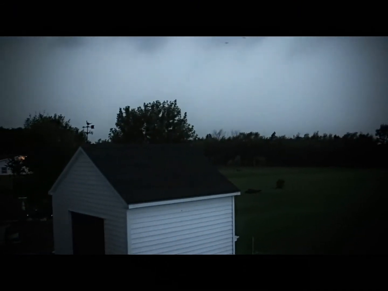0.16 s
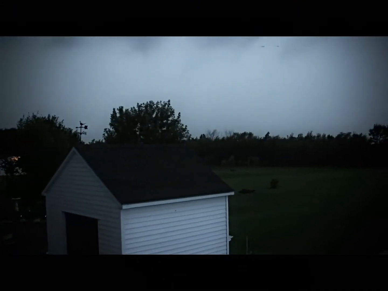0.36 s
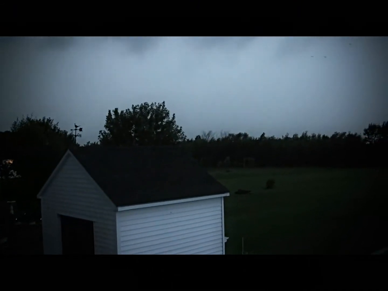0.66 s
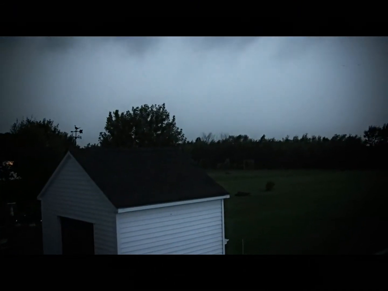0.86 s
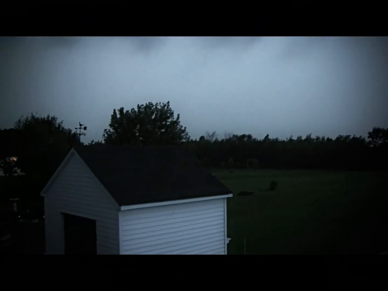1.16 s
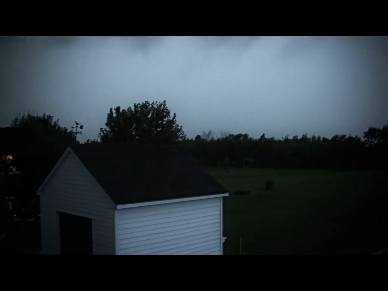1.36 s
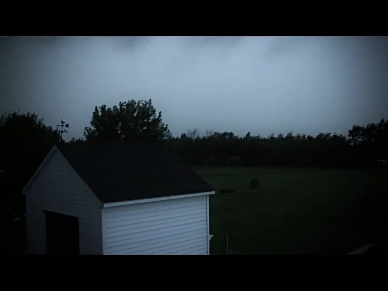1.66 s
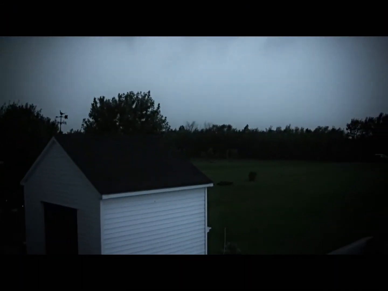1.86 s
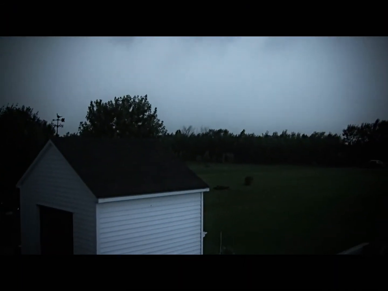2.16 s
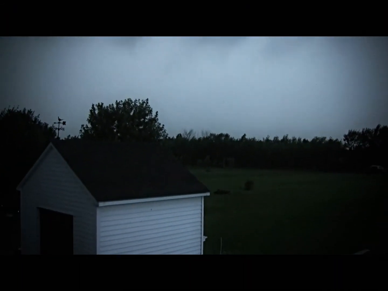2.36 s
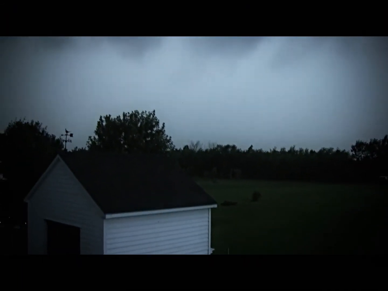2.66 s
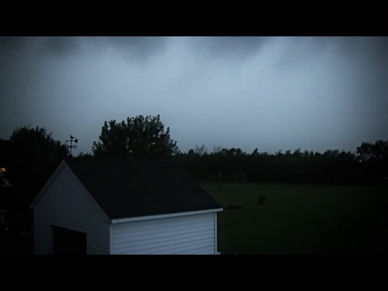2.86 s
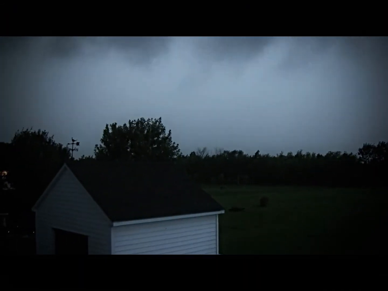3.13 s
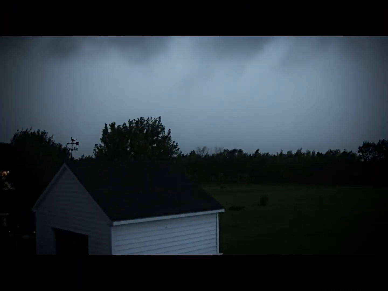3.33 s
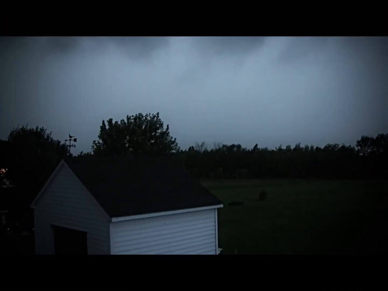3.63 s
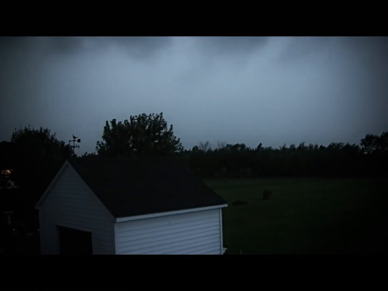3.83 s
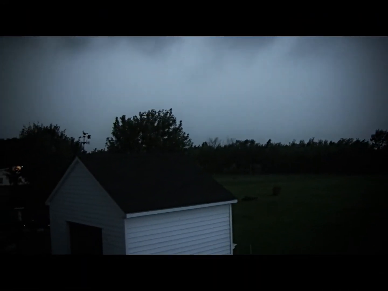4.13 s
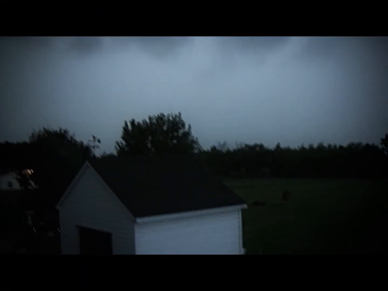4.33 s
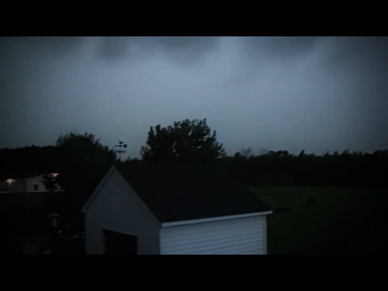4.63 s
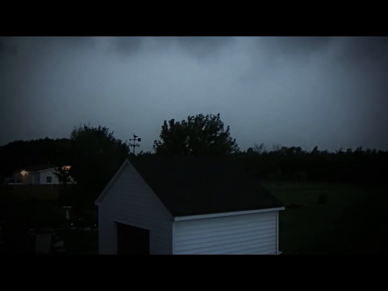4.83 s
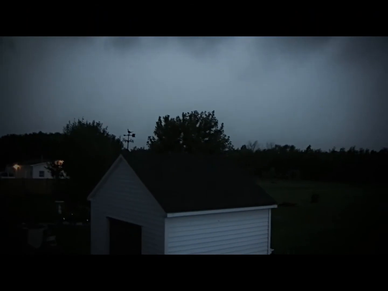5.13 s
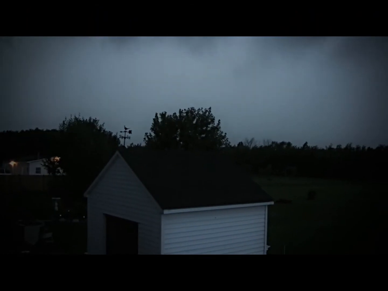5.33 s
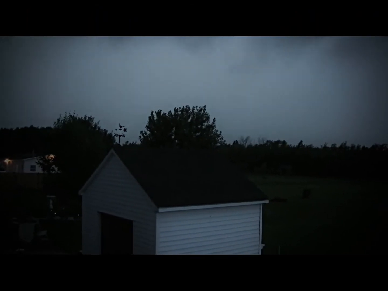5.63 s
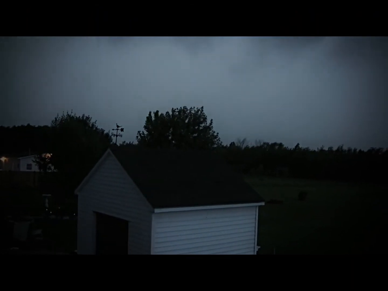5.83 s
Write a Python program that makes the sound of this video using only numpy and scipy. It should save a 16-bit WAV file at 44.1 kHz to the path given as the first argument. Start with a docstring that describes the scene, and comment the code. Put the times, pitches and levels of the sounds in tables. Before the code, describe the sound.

Outdoors in light rain, a brief low murmur and faint hiss are broken almost at once by a close thunderclap. Huge bassy thuds pile up for about two seconds while a hard object, like a window frame, clacks close to the microphone. The thunder then rolls away, duller and softer, in uneven bumps to the end.

```python
"""A close thunderclap over a field, in light rain, taken from an upper window on two close microphone ports.
Shock fronts from the crooked lightning channel, random kicks coloured in four registers, arrive in great
claps and thuds, then roll on, duller with distance. Something hard clacks beside the microphone, like a
window frame being nudged: scattered noise and ringing modes. Far off lie a hiss of rain (merged drops), a
low murmur and whooshes (filtered noise), and faint peeps (tone bursts). A limiter holds the highest peaks."""
import sys
import numpy as np
from scipy import signal
from scipy.fft import rfft, irfft
from scipy.io import wavfile
from scipy.ndimage import uniform_filter1d, minimum_filter1d

SR = 44100
rng = np.random.default_rng(int(sys.argv[2]) if len(sys.argv) > 2 else 0)


def unload_audio(sound):
    """Save the sound as a 16-bit wav file, at the path given as the first command line argument."""
    columns = np.transpose(np.atleast_2d(sound))
    # keep every value between -1 and 1, then stretch to whole-number steps
    steps = np.round(np.clip(columns, -1, 1) * 32767)
    wavfile.write(sys.argv[1], SR, steps.astype(np.int16))


N = 264319
TIME, FREQ = np.arange(N) / SR, np.fft.rfftfreq(N, 1 / SR)

# the two microphone ports, left over right: [f/Hz, level difference/dB]
PORT_LEAN = [(60, 1.5), (110, 0), (200, -1), (380, -3.5), (700, -1.5), (1290, -1.0), (2380, -1.5),
             (4400, -0.5), (8120, -2), (15000, -9.5)]
# the two microphone ports, sound they do not share: [f/Hz, level/dB]
PORT_UNSHARED = [(30, -6.5), (70, -35), (150, -21), (300, -20.5), (600, -15.5), (1500, -10.5), (3000, -5),
                 (6000, -5), (10000, -4.5), (15000, -4)]
# distant rain, relative colour: [f/Hz, level/dB per Hz]
RAIN_COLOUR = [(100, 4.5), (800, 12.5), (1500, 7.5), (2200, 4), (3200, -0.5), (5000, -3.5), (7000, -7.5),
               (10000, -13), (14000, -16.5), (16000, -17.5)]
# steady low murmur of the outdoors, relative colour: [f/Hz, level/dB per Hz]
MURMUR_COLOUR = [(20, -39.5), (45, -16.5), (70, -8), (100, -2.5), (130, -2.5), (175, -4.5), (250, 2.5),
                 (285, -1), (335, 3), (400, -8.5), (650, -13), (1000, -20), (2000, -36), (6000, -75)]
# shock fronts from the near part of the channel, relative colour: [f/Hz, level/dB per Hz]
NEAR_COLOUR = [(20, -38), (42, -19), (70, -6), (110, -4.5), (160, -3.5), (245, -1.5), (320, -8.5),
               (480, -11), (700, -15.5), (1000, -24), (1400, -31.5), (2000, -43), (3000, -57), (5000, -97)]
# shock fronts from the far part of the channel, relative colour: [f/Hz, level/dB per Hz]
FAR_COLOUR = [(20, -46), (42, -27), (72, -5.5), (125, -5), (157, 2), (190, -2.5), (250, -1.5), (350, -11.5),
              (500, -15.5), (750, -20.5), (1000, -37), (1300, -37.5), (1900, -60), (4000, -59)]
# claps, one from each branch or bend of the channel; each register takes its own share of the brightness:
# [start t/s, relative level/dB, rise t/s, hold t/s, brightness/dB]
CHANNEL_CLAPS = [(0.307, -12, 0.083, 0.028, 3.5), (0.442, -18, 0.023, 0.31, 7),
                 (0.571, -12.5, 0.013, 0.11, -4.3), (0.759, -10.5, 0.025, 0.039, -5.5),
                 (0.907, -16.5, 0.011, 0.072, -6), (1.211, -18.5, 0.012, 0.021, -2),
                 (1.574, -18.3, 0.041, 0.098, 8.5), (1.795, -28.5, 0.07, 0.026, 11.5),
                 (2.07, -19, 0.056, 0.051, 5), (2.22, -24, 0.046, 0.32, 6.5),
                 (2.615, -31.5, 0.052, 0.021, 12.5), (2.846, -18, 0.076, 0.15, -1),
                 (3.112, -19.5, 0.053, 0.16, -3), (3.473, -25.5, 0.029, 0.031, 5.5),
                 (3.616, -18.5, 0.019, 0.015, -7.5), (3.853, -21, 0.014, 0.16, -28),
                 (4.112, -32.5, 0.024, 0.004, -24), (4.235, -23.5, 0.08, 0.23, -4),
                 (4.626, -26.5, 0.083, 0.028, 7.5), (4.725, -23, 0.041, 0.259, -4.5),
                 (5.213, -19, 0.025, 0.019, -5), (5.337, -27, 0.047, 0.14, -2.5),
                 (5.534, -26.5, 0.037, 0.007, 6.5)]
# the unbroken roll that carries the claps, followed by each register to its own degree: [t/s, level/dB]
ROLL_LEVEL = [(0.33, -35.5), (0.39, -22), (0.6, -18), (1.07, -24.5), (1.23, -22.5), (1.51, -26.5),
              (1.7, -15.5), (1.76, -22.5), (1.78, -16), (1.92, -25), (2.16, -22), (3.92, -33.5),
              (5.99, -37)]
# pressure swell, boom, body and tearing edge of the thunder, levels before the overall trim:
# [low f/Hz, high f/Hz, level at the roll reference/dB, follow/dB per dB of roll,
#  share of a clap/dB, share of its brightness/1, lurch rms/dB]
THUNDER_REGISTERS = [(15, 76, -40, 0.86, -25, 0.23, 1), (90, 172, -27.5, -0.04, 0, 0.12, 1.46),
                     (207.6, 413, -23.5, 0.78, -1.5, 1, 0.5), (418, 6000, -25.5, 0.95, -19.5, 0.8, 1)]
# blows on the frame; the ring is set against the noise burst and trimmed with all its modes:
# [t/s, level/dB, tilt/dB per octave, top of the colour f/Hz, ring level before trim/dB, scatter t60/s]
FRAME_BLOWS = [(.354, -23, 2, 2410, -16, 0.076), (0.634, -32, 0.5, 12000, -14.5, 0.15),
               (1.2256, -34, 13, 16000, -23, .015), (1.2305, -18, 4, 9000, -0.5, 0.063),
               (1.231, -22, 4.5, 14000, 2, 0.12), (1.352, -34, 1.5, 7000, -19, 0.12),
               (1.3648, -16.5, 0.5, 6550, -32, 0.063), (1.379, -25.5, 6, 8650, -14, 0.068),
               (1.384, -23.5, -2.5, 8000, -16, 0.12), (1.757, -37, 3.5, 10000, -26, 0.09)]
# modes of the frame, each detuned a little at every blow: [nominal f/Hz, relative level/dB, t60/s]
FRAME_MODES = [(730, 9, 0.087), (1100, 1, 0.076), (1570, 5.5, 0.01), (2190, 9, 0.028), (2300, 7, 0.025),
               (2950, -24, 0.034), (3460, -10.5, .07), (4230, -17, 0.059), (5540, -21, .06),
               (6700, -14.5, 0.078)]
# clack as the nearby walls scatter it, relative colour: [f/Hz, level/dB per Hz]
SCATTER_COLOUR = [(150, -30), (600, 9), (1100, 10), (2200, 2.5), (2900, -7.5), (4500, -11), (6800, -18),
                  (9000, -26), (11500, -36.5), (15500, -34)]
# faint peeps in the distance: [centre t/s, level/dB, f/Hz, half-length to 1/e t/s]
DISTANT_PEEPS = [(.365, -59.5, 4470, .04), (.97, -61.5, 4450, .03), (2.105, -54, 5080, 0.024),
                 (2.105, -69, 8080, .025)]
# the heaviest single thuds, before the ports' lean: [centre t/s, level/dB, f/Hz, half-length to 1/e t/s]
HEAVY_THUDS = [(.402, -3, 124, 0.019), (.748, -7, 161, 0.0089), (.83, -4.5, 158, 0.019),
               (1.605, -10, 194, 0.015), (1.652, -4.5, 238, 0.021), (2.095, -12.5, 247, 0.057),
               (2.93, -8, 181, .01), (3.0, -8, 167.6, 0.016), (3.98, -9, 153, .025),
               (4.11, -18, 152, 0.014), (4.445, -13.5, 178, 0.01), (4.785, -12, 137, .015),
               (5.585, -16, 148, .014)]
# faint hollow whooshes far away: [centre t/s, level/dB, half-length to 1/e t/s]
FAR_WHOOSHES = [(4.72, -46, 0.056), (4.914, -49, 0.1)]


def amp(db):
    """Decibels to gain."""
    return 10 ** (np.asarray(db) / 20)


def unit(x):
    """Scales to rms 1."""
    return x / np.sqrt(np.mean(x ** 2) + 1e-20)


def at_hz(points, hz):
    """Reads a spectrum on a log-frequency axis."""
    f, value = np.transpose(points)
    return np.interp(np.log(hz + 1), np.log(f + 1), value)


def shape(x, gain):
    """Filters a whole-length sound by a gain per frequency."""
    return irfft(rfft(x) * gain, N)


def band(lo_hz, hi_hz, order=12):
    """Gain of a band with smooth edges, half power at each corner."""
    f = FREQ + 1
    low_edge = 1 + (lo_hz / f) ** order
    high_edge = 1 + (f / hi_hz) ** order
    return 1 / np.sqrt(low_edge * high_edge)


def steady(x, span_s):
    """Evens the power to about 1 over the given span, leaving the fast grain."""
    size = max(int(span_s * SR), 3)
    power = np.mean(x ** 2, 0)
    for _ in range(2):
        power = uniform_filter1d(power, size)
    return x / np.sqrt(abs(power) + 1e-12)


def ports(shared, unshared):
    """Two close ports hear the bass alike and the treble less so."""
    side = shape(unshared, amp(at_hz(PORT_UNSHARED, FREQ)))
    return np.array([shared + side, shared - side])


def add(mix, s, sound):
    """Mixes a sound in at a time."""
    part = mix[..., max(round(s * SR), 0):][..., :sound.shape[-1]]
    part += sound[..., :part.shape[-1]]


def kicks(per_s, spread_db):
    """Single-sample kicks of either sign, at random times and of uneven size, scaled to rms 1."""
    size = amp(spread_db * np.minimum(rng.exponential(1, N), 4))
    struck = rng.random(N) < per_s / SR
    return unit(size * rng.choice([-1, 1], N) * struck)


def tone_bursts(rows):
    """Short bell-shaped bursts of tone, each at a random phase."""
    out = np.zeros(N)
    for s, db, hz, length in rows:
        t = TIME - s
        bell = np.exp(-(t / length) ** 2)
        out += amp(db) * bell * np.cos(2 * np.pi * (hz * t + rng.random()))
    return out


def rain(level_db=-58):
    """Countless far drops merge into a faint hiss; its finest fizz wavers a little."""
    drops = ports(kicks(per_s=14000, spread_db=1.5), kicks(per_s=14000, spread_db=2.5))
    hiss = shape(drops, amp(at_hz(RAIN_COLOUR, FREQ)))
    # the level is that of the treble the ports share
    hiss /= np.std(shape(hiss.mean(0), band(3420, 15000)))
    waver_db = 0.9 * unit(shape(rng.standard_normal(N), band(1.5, 6, order=4)))
    fizz = shape(hiss, band(8000, 20000))
    return amp(level_db) * (hiss + fizz * (amp(waver_db) - 1))


def murmur(level_db=-28.5):
    """A dull steady background of coloured noise; level before the ports' lean."""
    air = ports(*rng.standard_normal((2, N)))
    return amp(level_db) * unit(shape(air, amp(at_hz(MURMUR_COLOUR, FREQ))))


def claps(bright_share, fade_db_per_s=122.5):
    """Power of all claps: each builds, holds while its stretch of channel arrives, and dies away."""
    power = np.zeros(N)
    for s, db, rise, hold, bright_db in CHANNEL_CLAPS:
        age = TIME - s
        fade_db = fade_db_per_s * np.maximum(age - rise - hold, 0)
        build = np.clip(age / rise, 0, 1)
        power += (build * amp(db + bright_share * bright_db - fade_db)) ** 2
    return power


def lurch():
    """Slow chance of rms 1, as fronts happen to pile up or thin out."""
    return unit(shape(rng.standard_normal(N), band(1.5, 13, order=4)))


def thunder(first_s=0.29, build_s=0.0047, roll_ref_db=-25, trim_db=-0.9):
    """Shock fronts, one from each kink, rounded by the air as they come from farther up the channel."""
    fronts = ports(kicks(per_s=4500, spread_db=2), kicks(per_s=8000, spread_db=1.5))
    near = unit(shape(fronts, amp(at_hz(NEAR_COLOUR, FREQ))))
    far = unit(shape(fronts, amp(at_hz(FAR_COLOUR, FREQ))))
    distance = np.interp(TIME, [2.2, 3.8], [0, 1])  # s, from near to far
    waves = (1 - distance) * near + distance * far
    swing_db = np.interp(TIME, *np.transpose(ROLL_LEVEL)) - roll_ref_db
    out = np.zeros((2, N))
    for lo_hz, hi_hz, roll_db, follow, clap_db, bright_share, lurch_db in THUNDER_REGISTERS:
        roll_power = amp(roll_db + follow * swing_db) ** 2
        clap_power = amp(clap_db) ** 2 * claps(bright_share)
        level = np.sqrt(roll_power + clap_power) * amp(lurch_db * lurch())
        out += level * steady(shape(waves, band(lo_hz, hi_hz)), span_s=0.037)
    # no front is heard until that from the nearest point of the channel arrives
    arrived = np.sin(np.pi / 2 * np.clip((TIME - first_s) / build_s, 0, 1)) ** 2
    return amp(trim_db) * out * arrived


def clacks(rise_s=0.00086, room_db=-23, room_t60_s=0.22, ring_trim_db=-1.0):
    """Each blow rings the frame and scatters off the nearby walls in a short dense burst."""
    out, size = np.zeros((2, N)), 2 ** 14
    t, hz = np.arange(size) / SR, np.fft.rfftfreq(size, 1 / SR)
    for s, db, tilt_db, top_hz, ring_db, t60 in FRAME_BLOWS:
        shared, unshared = rng.standard_normal((2, size))
        noise = shared + amp(-11.5) * np.array([unshared, -unshared])
        tilt = tilt_db * np.log2(np.maximum(hz, 700) / 2000)
        colour = amp(at_hz(SCATTER_COLOUR, hz) + tilt)
        colour /= np.sqrt(1 + (hz / top_hz) ** 8)  # a softer contact loses the top
        fade = amp(-60 * t / t60) + amp(room_db - 60 * t / room_t60_s)
        onset = 1 - np.exp(-t / rise_s)
        burst = unit(irfft(rfft(noise) * colour)) * fade * onset
        ring = np.zeros(size)
        for f, mode_db, life in FRAME_MODES:
            strength = rng.choice([-1, 1]) / np.sqrt(1 + (f / top_hz) ** 8)
            wave = np.sin(2 * np.pi * f * rng.uniform(0.96, 1.01) * t)
            ring += strength * amp(mode_db - 60 * t / life) * wave
        add(out, s, amp(db) * (burst + amp(ring_db + ring_trim_db) * ring))
    return out


def peeps():
    """Faint high tone bursts in the distance, alike on both ports."""
    return tone_bursts(DISTANT_PEEPS)


def thuds():
    """A stretch of channel lying side-on arrives all at once, as a few cycles of low tone."""
    return tone_bursts(HEAVY_THUDS)


def whooshes(hz=1280, width_hz=130):
    """Air through one soft resonance swells and fades."""
    resonance = 1 / (1 + (2 * (FREQ - hz) / width_hz) ** 2)
    air = unit(shape(rng.standard_normal(N), resonance))
    swell = sum(amp(db) * np.exp(-((TIME - s) / length) ** 2) for s, db, length in FAR_WHOOSHES)
    return air * swell


def scene():
    """Thunder a little to the right, rain all round, clacks close by the microphone."""
    lean_db = np.outer([0.5, -0.5], at_hz(PORT_LEAN, FREQ))
    storm = murmur() + thunder() + thuds()
    return rain() + shape(storm, amp(lean_db)) + clacks() + peeps() + whooshes()


def record(dry, ceiling=1.0, hold_s=0.0025, edge_hz=15650):
    """A fast limiter holds the highest peaks near full scale; then the band limit."""
    size = max(int(hold_s * SR), 3)
    gain = np.minimum(1, ceiling / (abs(dry).max(0) + 1e-9))
    gain = minimum_filter1d(gain, 2 * size)
    for _ in range(2):
        gain = uniform_filter1d(gain, size)
    lowpass = signal.firwin(511, edge_hz, window=("kaiser", 9), fs=SR)
    return signal.oaconvolve(dry * gain, lowpass[None], "same", axes=1)


dry = scene()
out = record(dry)
unload_audio(out)
```